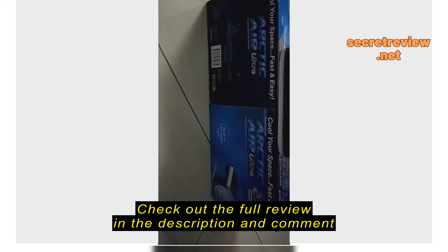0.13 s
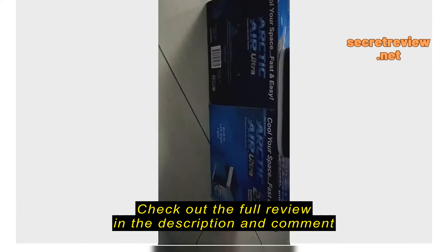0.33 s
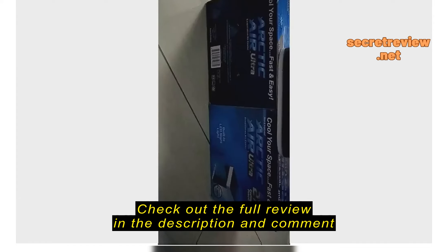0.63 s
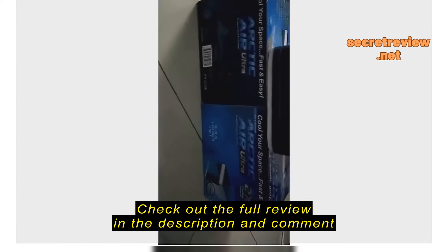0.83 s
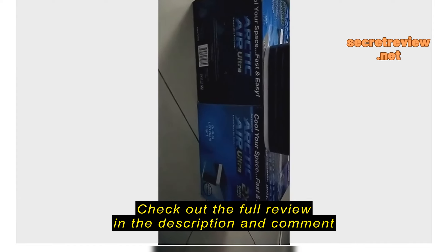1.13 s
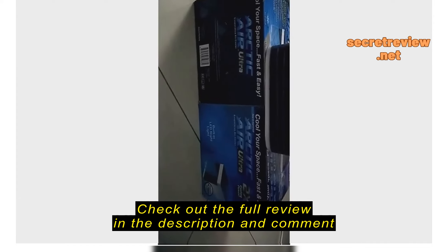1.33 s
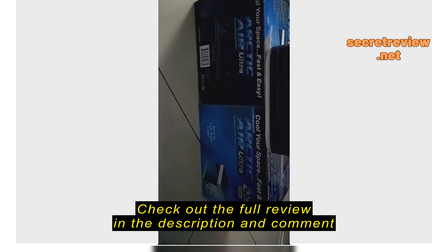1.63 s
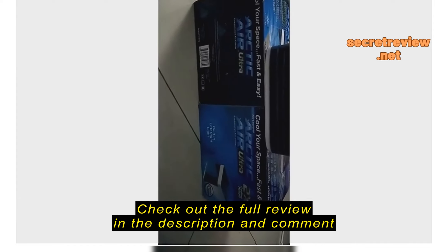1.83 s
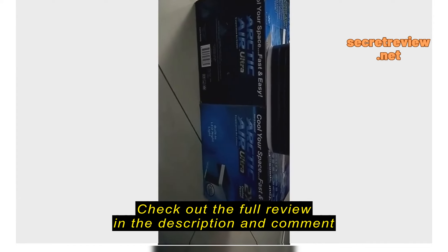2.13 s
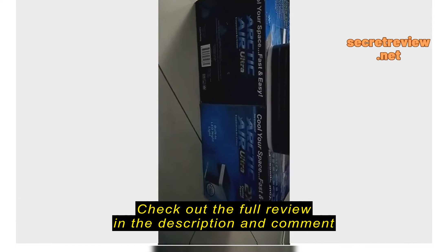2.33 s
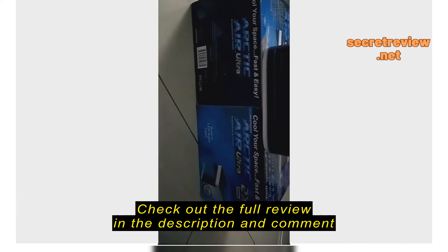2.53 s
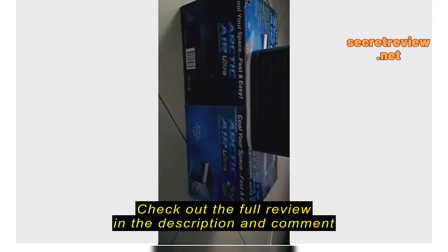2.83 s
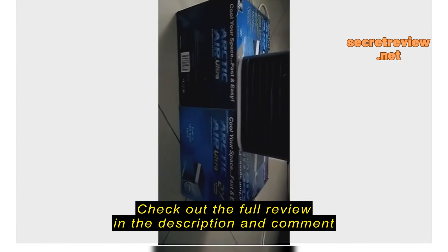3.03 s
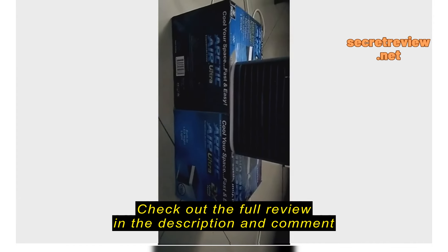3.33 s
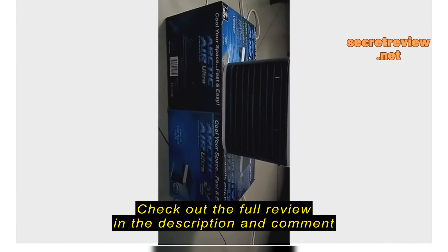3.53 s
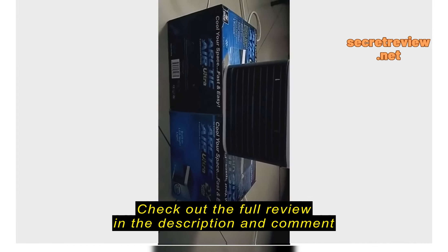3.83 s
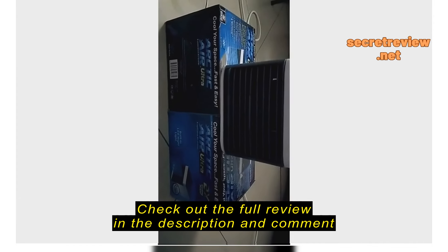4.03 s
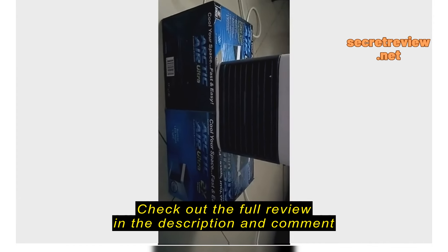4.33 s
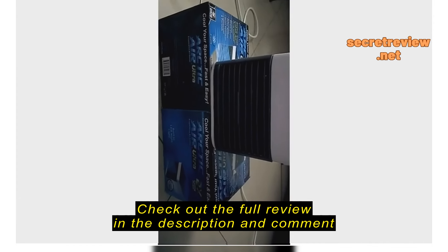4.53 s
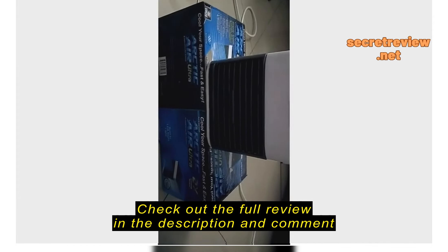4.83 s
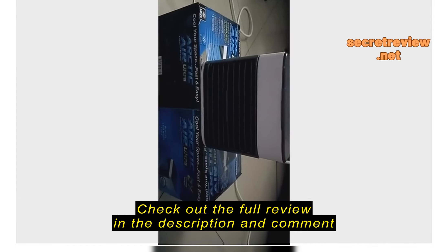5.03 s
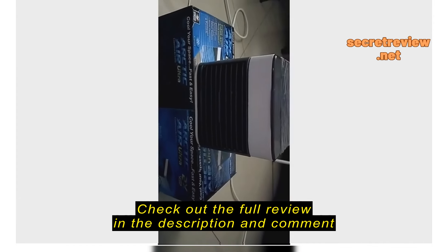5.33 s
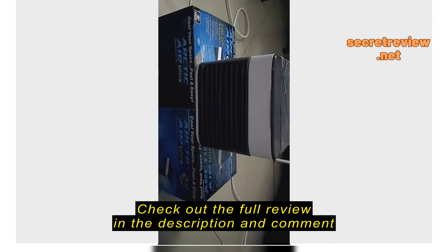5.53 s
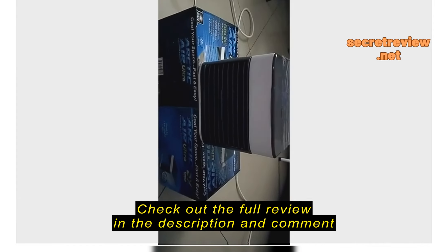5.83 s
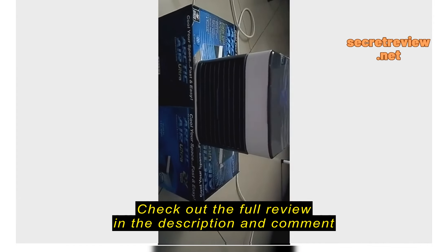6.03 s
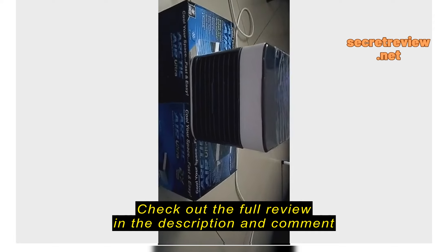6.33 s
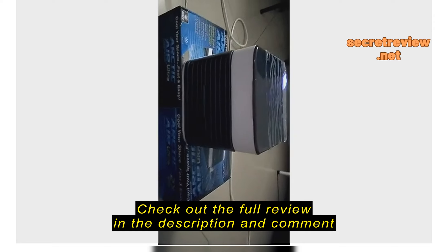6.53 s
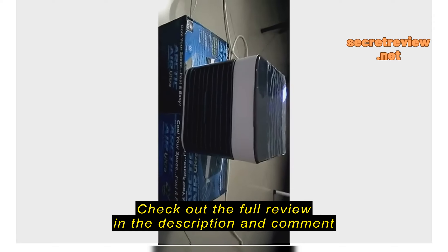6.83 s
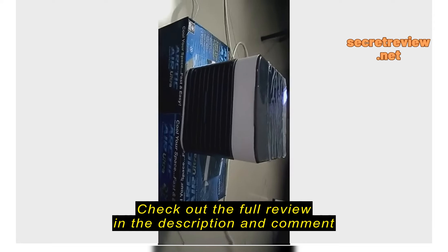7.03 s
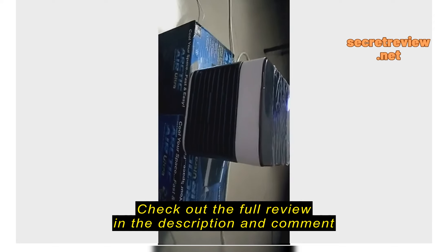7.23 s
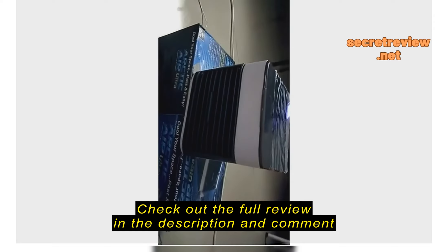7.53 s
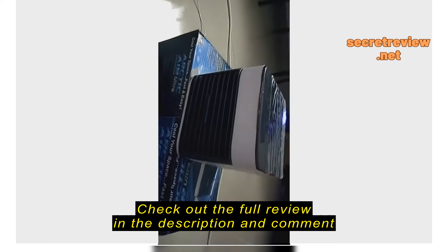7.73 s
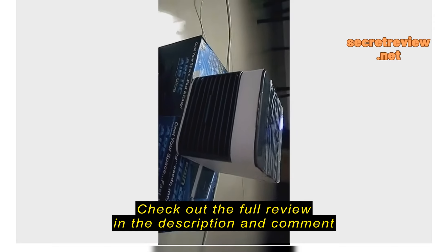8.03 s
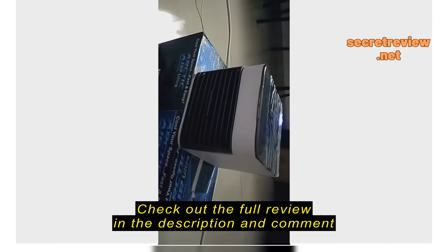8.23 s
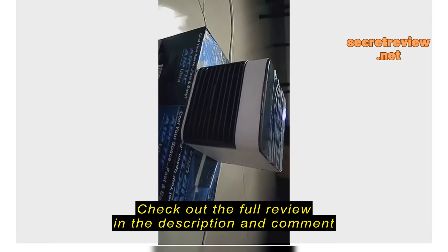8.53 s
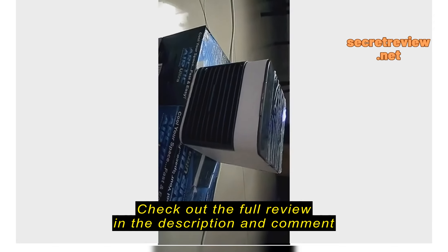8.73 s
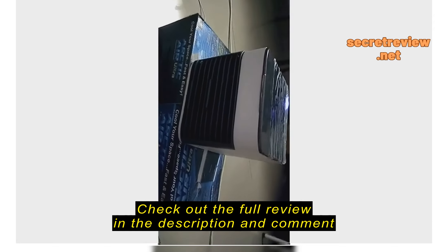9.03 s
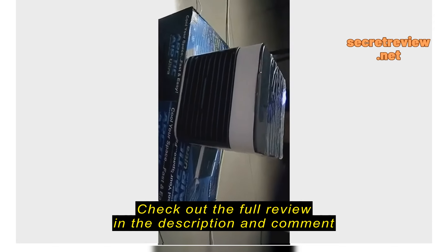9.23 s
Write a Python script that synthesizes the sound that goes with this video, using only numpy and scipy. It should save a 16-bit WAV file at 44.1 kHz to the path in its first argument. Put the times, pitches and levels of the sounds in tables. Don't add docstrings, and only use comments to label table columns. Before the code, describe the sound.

After a scrap of distant fan noise and a short gap, a near cooler runs steadily with airy hiss and bursts of low wind rumble.

```python
import sys
import numpy as np
from scipy import signal
from scipy.fft import next_fast_len
from scipy.io import wavfile
from scipy.ndimage import uniform_filter1d, map_coordinates

SR = 44100
rng = np.random.default_rng(int(sys.argv[2]) if len(sys.argv) > 2 else 0)


def magnitude_from_level(level_db):
    exponent = np.asarray(level_db, float) / 20
    return 10 ** exponent


def unload_audio(sound):
    columns = np.transpose(np.atleast_2d(sound))
    steps = np.round(np.clip(columns, -1, 1) * 32767)
    wavfile.write(sys.argv[1], SR, steps.astype(np.int16))


N = 413658

# time in seconds, turns per second.
SHAFT_SPEED = [(.4, 60.3), (3, 61.2), (5, 61.4), (6.5, 62.3), (9.38, 62.4)]
# multiple of the shaft, level in dB.
UPPER_ORDERS = [(4, -66.5), (7, -72.5), (8, -66.5)]
# time in seconds, lift in dB, half width in seconds.
SECOND_SPOTS = [(.42, -13, .06), (.72, 4, .08), (.87, -9, .1), (1.9, 5, 0.69), (4.6, -7, 0.21),
                (5.5, -6, .15), (6.3, -16, 0.28), (6.9, -3.5, .3), (8.35, -14, .12)]
THIRD_SPOTS = [(.98, 2.5, .07), (1.45, 4.5, 0.077), (1.85, -10, 0.045), (2.2, 5.5, 0.18), (2.75, 3, 0.18),
               (3.1, -3, .08), (3.5, 7.5, .2), (3.85, -3, .12), (4.3, -9, .08), (5.38, 5.5, .15),
               (5.7, -2, .1), (6.3, -5, .1), (6.6, 6.5, .1), (7.4, 3.5, 0.28), (7.79, -8, .06),
               (8.05, 3, .08), (8.35, -7, 0.04), (8.8, 2.5, 0.045), (9.28, -9, .05)]
FIFTH_SPOTS = [(1.27, -14, .1), (1.92, 5, .08), (2.45, -7, .1), (4.3, -8, 0.072), (4.9, 4, .08),
               (6.95, -6, .15), (8.7, 10, .05), (9.33, 9, 0.11)]
WHIR_SPOTS = [(.65, 2, .15), (1.8, -5, .04), (2.38, -5, 0.047), (2.66, -7, 0.056), (4.3, -6, 0.092),
              (4.72, 4.5, .06), (4.85, -6, .03), (5.85, -4, .05), (6.13, -14, 0.048), (6.25, 3, .05),
              (6.38, -13, .05), (6.85, -9, 0.096), (7.2, 1.5, .25), (7.55, -8, .03), (8.08, 3, .05),
              (8.38, -7, .06), (8.75, -5, .05)]
# time in seconds, pitch in Hz.
WHIR_PITCH = [(.4, 358.3), (1.3, 360.3), (2, 360), (3.2, 359), (4.2, 360.1), (5.5, 364), (7.5, 360.3),
              (9.38, 360.2)]
# multiple of the whir, level over it in dB.
WHIR_OVERTONES = [(2, -11.5), (3, -11), (4, -12)]

# time in seconds, viewpoint (held within 0 to 3).
VIEWPOINT = [(.4, 1), (2.8, -0.1), (4, 2), (5, 1.3), (6.3, 2.5), (7.2, 2.5), (8, 6), (9.38, 3)]
# frequency in Hz, level in dB per Hz.
RUSH_SPECTRUM = [(25, -40), (45, -36), (70, -13.5), (100, -6.5), (200, -1.5), (330, -5.5), (400, -8),
                 (700, -5), (1000, -8.5), (2200, -6.5), (3000, -13.5), (3800, -25.5), (5000, -29),
                 (7000, -90)]
HISS_SPECTRUM = [(2060, -20.5), (3500, 0), (4060, -13.5), (4990, -11), (6010, -3.5), (6750, -5),
                 (7500, -3.5), (8450, -5), (11000, -22.5), (14300, -60), (22000, -120)]
FIZZ_SPECTRUM = [(9000, -60), (10500, -25), (11500, -16), (12100, -6.5), (13000, -7.5), (13700, -5.5),
                 (14300, -8.5)]
# centre in Hz, width in Hz, height in dB.
BOX_PEAKS = [
    [(1510, 140, 1.5)],
    [(620, 130, -1.5), (1384, 120, 3.5), (2020, 150, -3)],
    [(1050, 150, 3.5), (2480, 67, 4)],
    [],
]
GRILLE_PEAKS = ([(6080, 97, -2), (6800, 100, -6), (7700, 220, 1), (8400, 130, -9), (8800, 200, 0)],
                [(5790, 34, -6), (6320, 87, -3), (7150, 46, -3), (7550, 160, -1), (7900, 190, -18),
                (8600, 160, -9)], [(5340, 120, 2.5), (5870, 300, -1.5), (6200, 300, -0.5), (6700, 60, -6),
                (7500, 470, -5), (8000, 140, -6)], [(5390, 160, 0), (5600, 220, -2.5), (5970, 420, 0),
                (7500, 100, -10), (8160, 290, -4)])
SLOT_PEAKS = ([(12550, 240, 4), (13900, 300, -19)], [(12500, 290, 3), (14060, 120, -7)], [(12200, 180, -7),
              (12620, 250, 2.5)], [(12160, 250, -3), (12450, 450, -3), (12900, 400, -3)])
# time in seconds, aim in dB.
SLOT_AIM = [(.4, 0.5), (2.5, -2.5), (3.4, -0.5), (4.2, -1), (5, 3), (5.8, 0), (6.6, 1), (8.3, -1.5),
            (9.38, -0.5)]

# time in seconds, level in dB.
STREAM = [(.4, -58), (.7, -51), (.95, -57.5), (1.18, -53), (1.3, -47), (1.68, -42), (1.83, -44.5),
          (2.2, -45.5), (2.65, -50.5), (2.8, -59), (3.4, -63), (4.1, -63), (4.36, -52), (5.3, -52),
          (5.45, -63), (6, -66), (8.5, -73), (9.38, -68)]
# start in seconds, peak in dB, pitch in Hz.
EDDIES = [(0.514, -28, 132), (0.536, -25, 139), (0.79, -34, 120), (1.1, -35, 100), (1.213, -29, 110),
          (1.29, -24, 143), (1.355, -17.5, 131), (1.441, -18.5, 171), (1.49, -26, 113), (1.532, -22, 142),
          (1.633, -20, 128), (1.681, -15.5, 105), (1.721, -23, 120), (1.765, -19, 140), (1.872, -21, 126),
          (2.054, -28.5, 171), (2.092, -19.5, 126), (2.171, -24, 169), (2.277, -17, 162), (2.289, -20, 125),
          (2.351, -25.5, 102), (4.461, -23, 148), (4.636, -27, 151), (4.661, -26, 117), (4.811, -28.5, 137),
          (4.918, -27, 127), (4.993, -29, 129), (5.183, -22.5, 112), (5.281, -25.5, 127), (5.31, -28, 170)]
# frequency in Hz, level in dB per Hz.
THUD_SPECTRUM = [(30, -42), (50, -28), (70, -17), (95, 13.5), (125, -2), (160, -15), (250, -32),
                 (600, -120)]
FLUTTER_SPECTRUM = [(60, -60), (100, -13), (135, 1), (170, -1), (220, -8), (300, -12), (400, -38),
                    (600, -44), (1200, -120)]

# frequency in Hz, level in dB.
MAINS_TONES = [(100, -71), (200, -66), (300, -73.5), (452.7, -77.5)]
# frequency in Hz, level in dB per Hz.
SCRAP_SPECTRUM = [(40, -16), (100, -3.5), (250, -7.5), (550, -14.5), (900, -25.5), (2000, -24),
                  (3800, -38.5), (4400, -45), (5300, -49), (6200, -33), (8500, -36), (9300, -67),
                  (11000, -57), (12000, -35), (14200, -51)]
SCRAP_SIDE_SPECTRUM = [(24, -57), (40, -26), (364, -4), (819, -13), (972, -24), (1130, -12), (1750, -31),
                       (1980, -18), (7100, -36), (9530, -33), (14100, -63)]
# centre in Hz, width in Hz, height in dB.
SCRAP_PEAKS = [(1130, 87, 1), (6450, 56, 7), (7500, 80, 5)]
# start in seconds, end in seconds.
GAP = (.0735, .3955)

# start in seconds, rise in dB, hold in seconds, sinking time in seconds.
GAIN_STEPS = [
    (0.395, 6.5, 0.15, 0.032),
    (1.362, 2.5, 0.27, 1.13),
    (4.42, 2.5, 0.56, 0.62),
    (5.31, 1.5, .12, 0.18),
    (6.237, 2, .2, 0.95),
    (8.594, 3.5, 0.18, 0.35),
]
# lower edge in Hz, share of frames replaced.
FILL_BANDS = [(4220, .03), (4651, .05), (5168, .08), (5685, .11), (6288, .14), (6891, .15), (7580, .17),
              (8269, .18), (8958, .18), (9647, .28), (10336, .28), (11025, .1), (11714, .05), (12403, .08),
              (12750, .22), (14300, 0)]
# centre in Hz, width in Hz, depth in dB.
TREBLE_DIP = (7900, 62, -10)

SECOND_DB, THIRD_DB, FIFTH_DB, WHIR_DB = -52.5, -45.5, -56.5, -57
THIRD_FADE_DB_PER_S, FIFTH_FADE_DB_PER_S, WHIR_FADE_DB_PER_S = -0.6441, -1.6, -.3
UPPER_GROWS_DB_PER_S = .5
RUSH_DB, HISS_OVER_RUSH_DB, FIZZ_OVER_RUSH_DB = -50.5, -11.5, -20
HISS_AIM_SHARE = 0.13
FLUTTER_OVER_THUD_DB = 1
WAKE_DB, WAKE_FADE_S = -22.5, 0.047
WAKE_PIVOT_HZ, WAKE_TILT_DB_PER_OCT = 131, 8
SWING_CAP_DB = -25
MIC_LOW_HZ = 76.6
SCRAP_DB = -53
GAIN_RISE_S = 0.038


def motor():
    shaft_hz, = curves(SHAFT_SPEED)
    second_db = level(SECOND_DB, 0, SECOND_SPOTS) + 1.5 * wobble(12)
    third_db = level(THIRD_DB, THIRD_FADE_DB_PER_S, THIRD_SPOTS) + 1.3 * wobble(12)
    fifth_db = level(FIFTH_DB, FIFTH_FADE_DB_PER_S, FIFTH_SPOTS) + 2.8 * wobble(8)
    hum = magnitude_from_level(second_db) * tone(2 * shaft_hz, .35, 9.1)
    hum += magnitude_from_level(third_db) * tone(3 * shaft_hz, 0.45, 8)
    hum += magnitude_from_level(fifth_db) * tone(5 * shaft_hz, 0.53, 5)
    for order, db in UPPER_ORDERS:
        order_db = level(db - 3, UPPER_GROWS_DB_PER_S, []) + 3.4 * wobble(5)
        hum += magnitude_from_level(order_db) * tone(order * shaft_hz, 0.7, 8)
    return hum


def blades():
    pass_hz, = curves(WHIR_PITCH)
    whir = magnitude_from_level(2.2 * wobble(13)) * tone(pass_hz, .9, 9)
    for multiple, over_db in WHIR_OVERTONES:
        overtone_db = level(over_db - 2.5, UPPER_GROWS_DB_PER_S, []) + 3.6 * wobble(4)
        whir += magnitude_from_level(overtone_db) * tone(multiple * pass_hz, 1.4, 14)
    return magnitude_from_level(level(WHIR_DB, WHIR_FADE_DB_PER_S, WHIR_SPOTS)) * whir


def air():
    aim_db, = curves(SLOT_AIM)
    rush = magnitude_from_level(1.5) * noise(RUSH_SPECTRUM, .9, BOX_PEAKS, peak_db=1, ripple_db=1.3)
    hiss_db = HISS_OVER_RUSH_DB + HISS_AIM_SHARE * aim_db + 1.8 + 0.34 * wobble(15)
    hiss = magnitude_from_level(hiss_db) * noise(HISS_SPECTRUM, 0.75, GRILLE_PEAKS, peak_db=7.5, ripple_db=1.7)
    fizz_db = FIZZ_OVER_RUSH_DB + aim_db + 3.5 + 0.66 * wobble(30) + .8 * wobble(5)
    fizz = magnitude_from_level(fizz_db) * noise(FIZZ_SPECTRUM, 1.3, SLOT_PEAKS, peak_db=10, ripple_db=1.8)
    return magnitude_from_level(RUSH_DB + 0.58 * wobble(4.2)) * (rush + hiss + fizz)


def buffet():
    stream_db, = curves(STREAM)
    thud_power = magnitude_from_level(2 * stream_db + 4 * wobble(8.2))
    flutter_power = magnitude_from_level(2 * (stream_db + FLUTTER_OVER_THUD_DB) + 4 * wobble(9))
    pushes = np.zeros(N)
    t = np.arange(SR // 15) / SR
    after = np.arange(SR // 4) / SR
    for start_s, db, hz in EDDIES:
        start = round(start_s * SR)
        u = t * hz / 1.46
        cycles = np.sin(2 * np.pi * hz * t * (0.796 + 0.14 * u))
        pushes[start:][:len(t)] += magnitude_from_level(db + 0.5) * u * np.exp(-u * u) * cycles
        wake_shape = (1 - np.exp(-after / 0.0071)) * np.exp(-(after / WAKE_FADE_S) ** 2)
        wake = magnitude_from_level(2 * (db + WAKE_DB)) * wake_shape
        tilt = magnitude_from_level(2 * WAKE_TILT_DB_PER_OCT * np.log2(hz / WAKE_PIVOT_HZ))
        thud_power[start:][:len(after)] += wake / tilt
        flutter_power[start:][:len(after)] += wake * tilt
    gusts = magnitude_from_level(2.35 * wobble(35))
    thud = np.sqrt(thud_power) * unit(gusts * noise(THUD_SPECTRUM, 1.2))
    flutter = np.sqrt(flutter_power) * unit(gusts * noise(FLUTTER_SPECTRUM, 1.4))
    push = pushes + thud + flutter
    envelope = abs(signal.hilbert(push, next_fast_len(N))[:N])
    swing = uniform_filter1d(envelope, size=150)
    squeezed = push / (1 + (swing / magnitude_from_level(SWING_CAP_DB)) ** 4) ** .25
    low_cut = signal.butter(2, MIC_LOW_HZ, "high", fs=SR, output="sos")
    return signal.sosfilt(low_cut, squeezed)


def room():
    return sum(magnitude_from_level(db + 1.1 * wobble(1.98)) * tone(np.full(N, hz), .1, 1.9) for hz, db in MAINS_TONES)


def scrap():
    size = SR // 4
    mid = noise(SCRAP_SPECTRUM, 1.8, [SCRAP_PEAKS], peak_db=11, size=size)
    side = magnitude_from_level(-1.5) * noise(SCRAP_SIDE_SPECTRUM, 1.5, size=size)
    stereo = magnitude_from_level(SCRAP_DB) * np.array([mid + side, mid - side])
    return np.pad(stereo, ((0, 0), (0, N - size)))


def gain_control():
    t = np.arange(N) / SR
    gain_db = np.zeros(N)
    for s, up_db, hold_s, sink_s in GAIN_STEPS:
        rise = np.clip((t - s) / GAIN_RISE_S + .5, 0, 1)
        gain_db += up_db * rise * np.exp(-np.clip(t - s - hold_s, 0, None) / sink_s)
    return magnitude_from_level(gain_db)


def noise_fill(mono):
    shift = 776
    late = np.pad(mono, (shift, 0))
    hz, _, z = signal.stft(late, SR, "cosine", nperseg=2048)
    dip_hz, dip_width_hz, dip_db = TREBLE_DIP
    z = z * magnitude_from_level(dip_db * np.exp(-((hz - dip_hz) / dip_width_hz) ** 2))[:, None]
    edges, share = np.transpose(FILL_BANDS)
    band = np.searchsorted(edges, hz) - 1
    luck = rng.standard_normal((len(edges), z.shape[-1]))
    luck = uniform_filter1d(luck, size=2, axis=0)
    rank = luck.argsort(axis=1).argsort(axis=1) / z.shape[-1]
    filled = (rank < share[:, None])[band] & (band >= 0)[:, None]
    turn = np.exp(2j * np.pi * rng.random((2, *z.shape)))
    mixed = np.where(filled, magnitude_from_level(2.5) * z * turn, z)
    return signal.istft(mixed, SR, "cosine", nperseg=2048)[1][:, shift:shift + N]


def noise(spectrum, patchy_db, views=((),), peak_db=0, ripple_db=0, size=N):
    hz, t, z = signal.stft(rng.standard_normal(size), SR, nperseg=2048, noverlap=1536)
    eddies = patches(z.shape, 16, 4)
    ripple = patches(z.shape, 3, 90)
    base = magnitude_from_level(2 * along(spectrum, hz))
    shares = []
    for peaks in views:
        lift = 1 + sum(magnitude_from_level(2 * (db + peak_db)) / (1 + (2 * (hz - centre) / width) ** 2) ** 1.3
                       for centre, width, db in peaks)
        power = lift * base
        shares.append(power / power.sum())
    place = np.clip(np.interp(t, *np.transpose(VIEWPOINT)), 0, len(views) - 1)
    weight = np.clip(1 - abs(place - np.arange(len(views))[:, None]), 0, 1)
    colour = np.sqrt(np.transpose(shares) @ weight)
    z = z * colour * magnitude_from_level(patchy_db * eddies + ripple_db * ripple)
    return unit(signal.istft(z, SR, nperseg=2048, noverlap=1536)[1][:size])


def patches(shape, bins, frames):
    field = rng.standard_normal(shape)
    for _ in range(2):
        field = uniform_filter1d(field, bins, axis=0)
        field = uniform_filter1d(field, frames, axis=1)
    return unit(field)


def tone(hz, blur_rad, rate_hz):
    return np.sqrt(2) * np.sin(2 * np.pi * np.cumsum(hz) / SR + blur_rad * wobble(rate_hz))


def level(start_db, fade_db_per_s, spots):
    t = np.arange(0, N / SR, .005)
    db = start_db + fade_db_per_s * t
    for s, up_db, wide_s in spots:
        db = db + up_db * np.exp(-((t - s) / wide_s) ** 2)
    return np.interp(np.arange(N) / SR, t, db)


def wobble(rate_hz):
    knots = rng.standard_normal(int(N * rate_hz / SR) + 4)
    return map_coordinates(knots, [np.arange(N) * rate_hz / SR])


def curves(rows):
    s, *cols = np.transpose(rows)
    return [np.interp(np.arange(N) / SR, s, c) for c in cols]


def along(points, hz):
    f, v = np.transpose(points)
    return np.interp(np.log(hz + 1), np.log(f + 1), v)


def unit(x):
    return x / np.sqrt(np.mean(x ** 2) + 1e-20)


def scene():
    t = np.arange(N) / SR
    gap_start_s, gap_end_s = GAP
    swell = np.clip((t - gap_end_s) / .016, 0, 1)
    low = swell * (motor() + blades() + buffet() + room())
    fan = low + (.7 + .3 * swell) * air()
    near = noise_fill(gain_control() * fan)
    return near * (t > gap_end_s) + scrap() * (t < gap_start_s)


def band_limit(x):
    return signal.sosfilt(signal.butter(12, 14260, fs=SR, output="sos"), x)


def record(dry):
    return band_limit(dry)


dry = scene()
out = record(dry)
unload_audio(out)
```